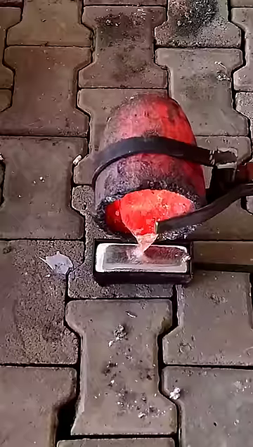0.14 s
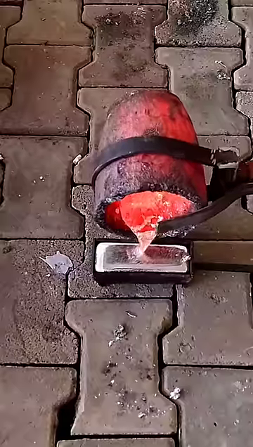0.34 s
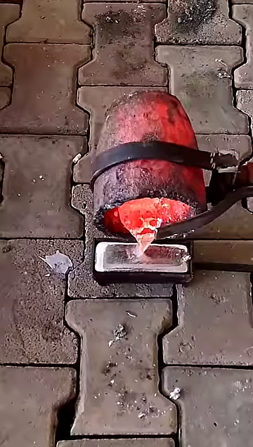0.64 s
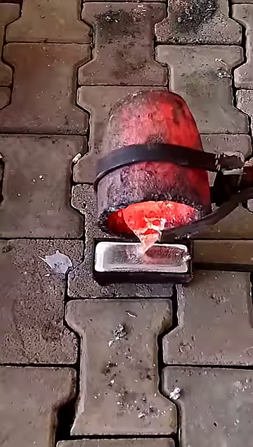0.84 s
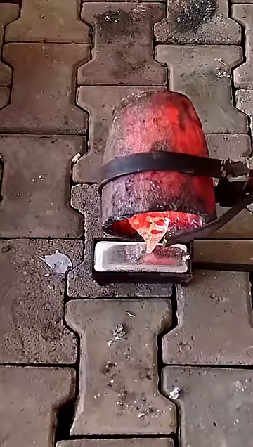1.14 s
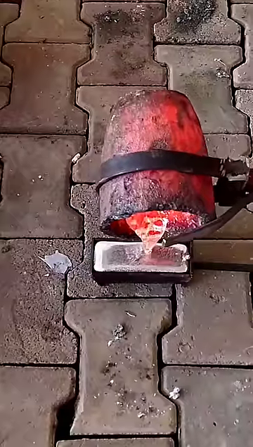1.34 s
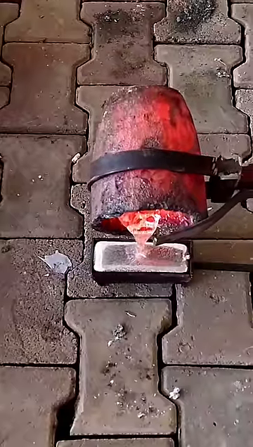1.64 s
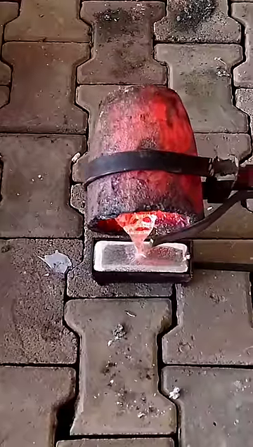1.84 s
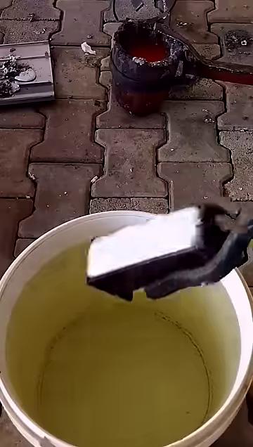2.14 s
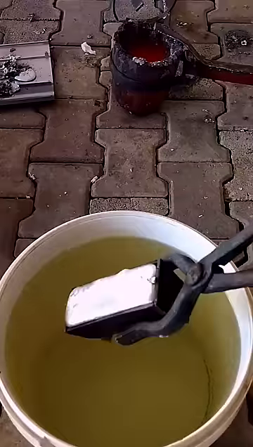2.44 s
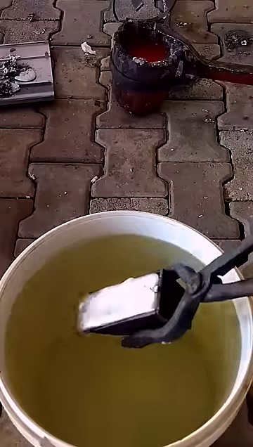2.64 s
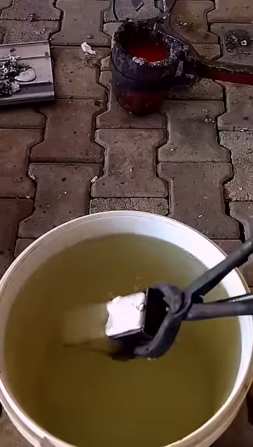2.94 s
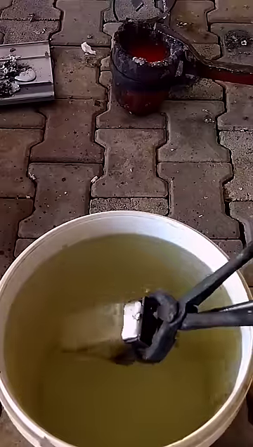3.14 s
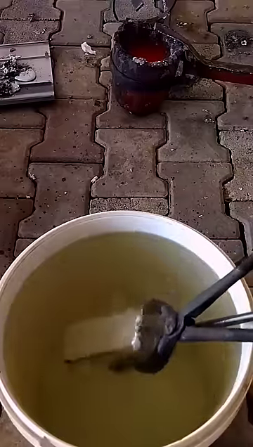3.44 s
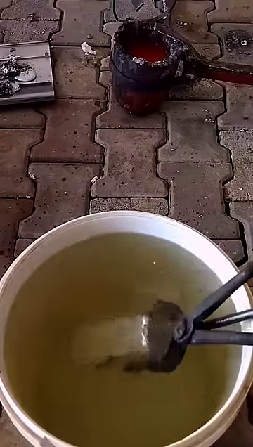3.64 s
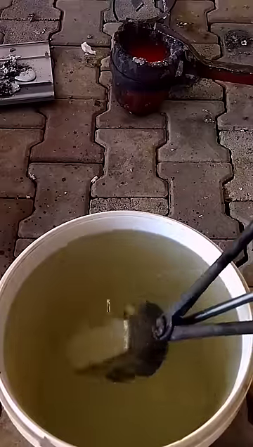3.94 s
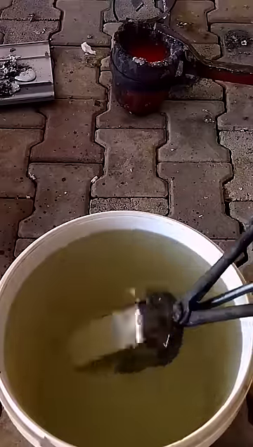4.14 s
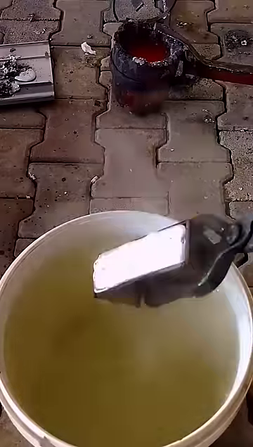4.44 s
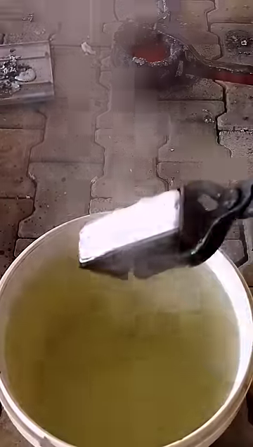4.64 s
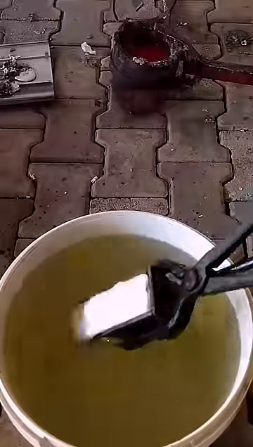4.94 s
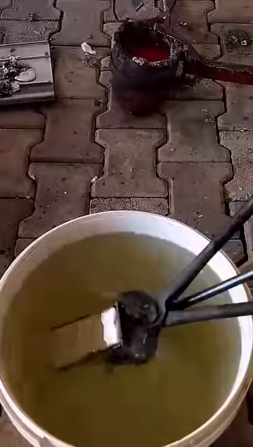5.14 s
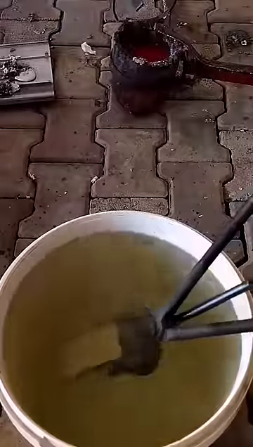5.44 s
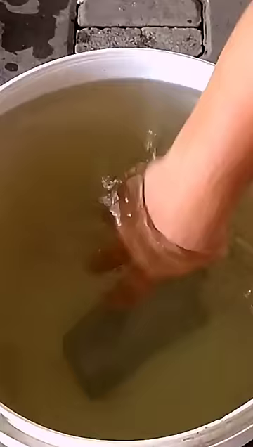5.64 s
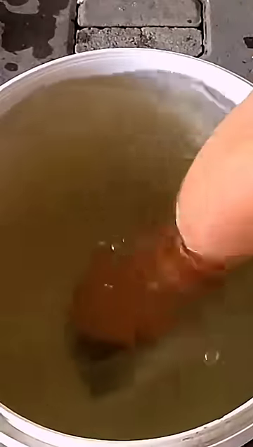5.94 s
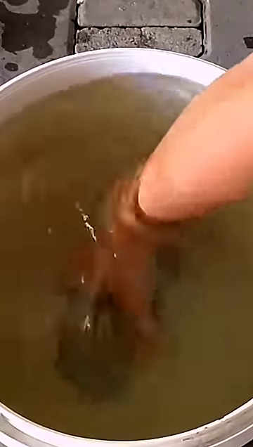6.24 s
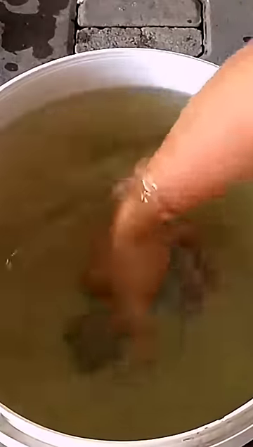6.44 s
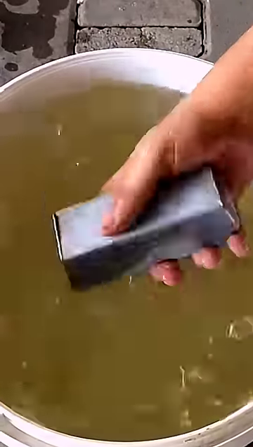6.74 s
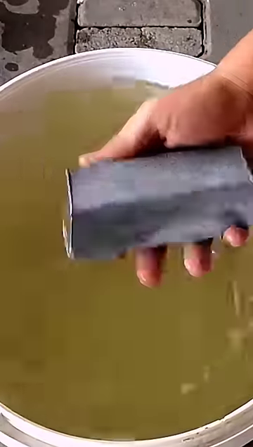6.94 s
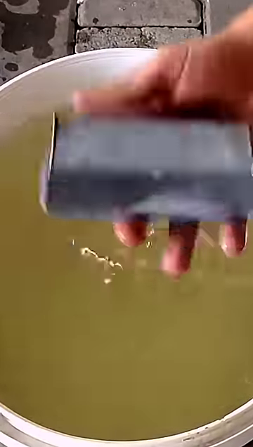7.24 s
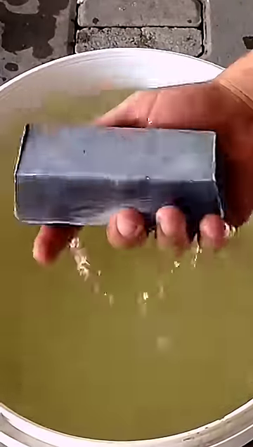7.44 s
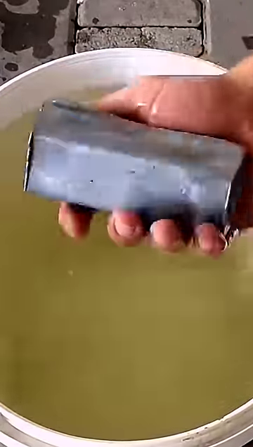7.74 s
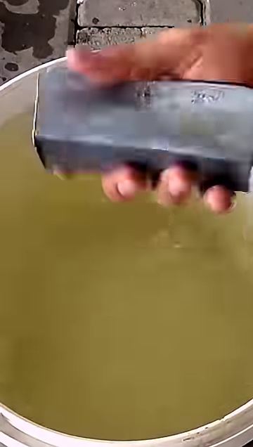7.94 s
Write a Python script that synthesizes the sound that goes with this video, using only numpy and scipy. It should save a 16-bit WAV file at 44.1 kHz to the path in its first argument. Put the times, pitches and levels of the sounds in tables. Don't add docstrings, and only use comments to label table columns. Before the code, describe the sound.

Outdoors in a paved yard, very quiet distant traffic, unsteady hum and faint metallic crackle come first. After a cut, a hot ingot hits water in a plastic bucket: loud harsh hiss, sizzle and popping steam bubbles, sinking into duller gurgles and knocks. It is raised with a pop and short sizzle, dipped again with a weaker burst, then a hand swishes and splashes out. Close stereo phone microphones above.

```python
import sys
import numpy as np
from scipy import signal
from scipy.fft import rfft, irfft, next_fast_len
from scipy.io import wavfile
from scipy.ndimage import uniform_filter1d, map_coordinates

SR = 44100
rng = np.random.default_rng(int(sys.argv[2]) if len(sys.argv) > 2 else 0)


def master(y):
    cut = np.clip(np.atleast_2d(y).T, -1, 1)
    pcm = np.round(cut * 32767)
    wavfile.write(sys.argv[1], SR, pcm.astype(np.int16))


def ratio_of_db(decibels):
    return 10 ** (np.asarray(decibels, float) / 20)


N = 356328

# time_s, vigour_db, depth (0 in the air, 1 sunk)
APPROACH = [(1.935, -56.5, 0.62), (2.03, -64, .5), (2.14, -68, 0.32), (2.209, -52.5, .06),
            (2.279, -62.5, .2), (2.285, -64.5, 0.022)]
FIRST_DIP = [(2.289, -44.5, .1), (2.301, -24, .12), (2.41, -30.5, 0.053), (2.511, -24.5, 0.24),
             (2.622, -24, 0.41), (2.706, -34.5, 0.34), (2.76, -25, .5), (2.85, -24.5, 0.46),
             (2.912, -31, 0.22)]
SINKING = [(2.965, -27, 0.34), (3.086, -27.5, .5), (3.224, -33, 0.32), (3.3, -30, 0.44),
           (3.384, -37.5, 0.34), (3.43, -43, 0.72), (3.69, -42.5, 0.98), (4.201, -47, 0.91)]
RAISED = [(4.226, -39, 0.14), (4.292, -30, 0.085), (4.334, -33.5, 0.21), (4.506, -52, .1),
          (4.656, -52.5, .02), (4.9, -58, 0.09)]
SECOND_DIP = [(4.91, -56, .02), (4.954, -29.5, 0.013), (5.046, -26.5, 0.061), (5.12, -35.5, 0.15),
              (5.192, -32.5, 0.28), (5.255, -38, 0.12), (5.31, -44, .65), (5.4, -46, 0.91),
              (5.659, -54.5, 0.82)]
# time_s, vigour_gain_db, depth_gain, fade_s
FILM_BURSTS = [
    (2.302, 7.5, -.04, 0.02),
    (2.348, 3.5, .25, 0.039),
    (2.932, 11.5, 0.16, 0.013),
    (3.394, 10, 0.26, .015),
    (3.728, 4.5, -0.028, 0.015),
    (3.842, 0, -.14, .1),
    (4.211, 12, 0.15, 0.0085),
    (5.279, 17.5, 0.25, 0.011),
]
BURST_RISE_S = 0.0075
# steam_db, sizzle_db, bubbling_db, gurgle_db
LAYERS_BY_DEPTH = [
    (0.5, -7.5, -12, -31.5),
    (-2, -4.5, 0.5, -26),
    (-12.5, -9, -0.5, -14.5),
    (-15, -8.5, 0, -1),
    (-27.5, -17.5, -8, -2.5),
]
BUBBLE_HZ, SINK_OCTAVES = 1000, 1.2
GURGLE_LAG_S, GURGLE_AT_ONCE = 0.075, 0.3
FRESH_FILMS = (2.289,)
FRESH_OCTAVES, GROWTH_S, FRESH_QUIET_DB = 1.3, 0.032, 14
COOLING_OCTAVES_PER_S = 0.12

# time_s, peak_db, pitch_hz, pitch_change (per length)
POCKETS = [(2.301, -16, 1300, -0.42), (2.346, -28.5, 690, 0.29), (2.507, -17.5, 1354, -.081),
           (2.551, -12, 870, 0.015), (2.579, -18, 625, -0.33), (2.718, -18, 1095, -0.61),
           (2.762, -25, 600, -0.6), (2.823, -23, 990, -0.16), (2.838, -16.5, 1075, -0.41),
           (2.929, -8, 734, -0.35), (2.967, -28.5, 369, -.26), (2.63, -24.5, 300, -.2),
           (3.225, -24.5, 415, -.4), (5.03, -35, 370, -.2), (5.135, -32, 428, -.3), (5.19, -31.5, 340, -.1),
           (3.385, -27.5, 710, -0.44), (3.45, -28, 323, -0.31), (3.601, -30.5, 401, -0.82),
           (5.183, -29.5, 802, -.47), (5.273, -13, 717, -0.1), (5.317, -26, 680, -0.7),
           (5.385, -40, 708, 0.015), (2.479, -25, 401.5, -0.19), (2.314, -28, 845, -.6),
           (2.335, -29, 430, -.3)]
POCKET_S = 0.005
# time_s, peak_db, pitch_hz
GULPS = [(3.569, -31.5, 153), (3.712, -34, 303), (3.761, -21.5, 185), (3.804, -23.5, 148),
         (3.946, -34, 185), (3.996, -39, 214), (4.167, -34, 382), (5.507, -41, 119.3), (5.569, -44, 242),
         (5.606, -38, 203)]
GULP_S, GULP_GLIDE = 0.0026, -0.33
# crest_s, peak_db, pitch_hz, length_s, pitch_change (per length)
CHIRPS = [(2.2932, -24.5, 2330, 0.0033, -0.79), (2.3043, -18.5, 2090, 0.0055, -0.12),
          (2.9287, -20, 1480, 0.0056, -0.062), (4.209, -22, 400, 0.0034, -0.62),
          (5.2825, -29.5, 2110, .004, -0.077), (5.294, -26.5, 402, .008, -.1),
          (6.7665, -27.5, 1674, 0.0041, 0.45), (6.791, -22, 2980, .0014, -.1)]
# time_s, level_db, pitch_hz
SQUEAL = [(5.53, -64, 2000), (5.58, -58, 2050), (5.6, -59, 2100), (5.63, -58.5, 2450), (5.66, -62, 2500)]

# time_s, stir_db
GROPE = [(5.66, -53), (5.68, -56.5), (6.05, -59), (6.5, -68.5), (6.59, -71.5)]
SPLASH = [(6.6, -79), (6.63, -60.5), (6.674, -52.5), (6.741, -42), (6.768, -32), (6.781, -45),
          (6.842, -52.5), (7.0, -61), (7.38, -86)]
SPRAY_UNDER_DB, SPRAY_OUT_DB = -23, -8
# start_s, peak_db, pitch_hz, t60_s, pitch_rise (per t60)
DRIPS = [(6.87, -62, 3030, 0.64, -0.066), (5.285, -32, 714, 0.29, .01), (3.862, -36, 1163, 0.019, 0.21),
         (5.787, -45, 1260, 0.064, 0.16), (6.678, -32, 1060, 0.019, 0.28),
         (6.707, -31.5, 974, 0.034, -0.48), (6.721, -33, 675, 0.064, 0.085),
         (6.739, -36.5, 566, 0.11, 0.42), (6.762, -36, 1081, 0.032, 0.048), (6.952, -43, 2420, 0.025, .05),
         (7.041, -41, 1103, 0.052, -0.078), (7.055, -45, 1480, 0.038, .1),
         (7.692, -54.5, 1000, 0.066, 0.038)]
# start_s, peak_db, push_s
POPS = [
    (4.2068, -14, 0.00051),
    (6.678, -35.5, 0.00015),
    (6.764, -29.5, 0.00013),
    (3.8127, -40.5, .0003),
]
# start_s, peak_db, centre_hz, t60_s, rise_s
TICKS = [(1.222, -53.5, 10520, 0.17, .006), (1.725, -63, 11070, 0.066, .005),
         (1.824, -56.5, 10520, 0.043, .003), (2.434, -13.5, 8440, 0.088, 0.0087),
         (3.722, -45, 2200, 0.054, .003), (3.812, -41, 2480, 0.02, 0.00089),
         (3.85, -40, 3600, 0.027, 0.0018), (4.067, -50, 2000, 0.06, 0.0013),
         (4.206, -26, 2438, .015, .0003), (5.529, -40.5, 2680, 0.024, 0.00065),
         (6.622, -54, 9010, 0.038, .001), (6.677, -48, 4000, 0.014, 0.00051),
         (6.728, -41.5, 8500, 0.022, .001), (6.764, -35.5, 7115, 0.021, 0.0016),
         (6.862, -55, 10000, .015, .001), (7.357, -49.5, 11620, 0.038, .001),
         (7.475, -56.5, 11460, .012, 0.00039), (7.642, -58.5, 12500, .012, .0005),
         (7.67, -54.5, 13500, .012, .0005), (7.692, -47, 4800, .012, .0004),
         (7.992, -51, 9950, 0.014, 0.00044)]
# start_s, peak_db, centre_hz, t60_s
FLICKS = [(1.228, -62.5, 2200, 0.27), (1.944, -54, 1700, .45), (5.655, -64, 8880, .04),
          (6.178, -75.5, 10000, .04), (6.48, -69.5, 9000, 0.066)]
FLICK_RISE_S = 0.002

# frequency_hz, level_db (per Hz)
STEAM_COLOUR = [(2060, -25), (3500, -3), (4540, -1), (4930, -4.5), (6470, -2), (7200, -8.5), (9280, 1.5),
                (11300, -1.5), (12300, 0.5), (15200, -5), (15900, -29)]
SIZZLE_COLOUR = [(760, -25), (1300, -3), (1440, -11.5), (1600, -6), (1910, -6), (2430, -5), (6000, -14),
                 (7800, -37), (13200, -120)]
FROTH_COLOUR = [(250, -38), (400, -13), (800, 2.5), (1500, -3.5), (2400, -22.5)]
GURGLE_COLOUR = [(24, -48.5), (40, -17), (146, -7), (311, -3), (337, -6.5), (399, -4.5), (489, -19),
                 (600, -15), (780, -44), (1320, -120)]
TRICKLE_COLOUR = [(210, -57), (350, -35), (642, -1), (1230, -1.5), (1640, -2.5), (3010, -7), (6000, -22.5),
                  (7800, -56.5), (13200, -120)]
AIR_COLOUR = [(180, -37), (300, -3.5), (472, -8.5), (542, -10), (1400, -13.5), (2740, -20), (8000, -36.5),
              (10400, -75.5), (17600, -120)]
FIZZ_COLOUR = [(4500, -29.5), (6500, -8.5), (7600, -12), (9400, -0.5), (12400, -3), (15900, -2.5)]
TRAFFIC_COLOUR = [(15, -76), (25, -38), (43, -33), (51, -16), (62, -5.5), (86, 1), (129, -3.5), (188, -3.5),
                  (233, -3), (365, -15.5), (500, -17.5), (650, -51.5), (1100, -120)]

# frequency_hz, t60_s
WALLS = [(200, 0.88), (2000, 0.39), (10000, 0.36)]
# pitch_hz, level_db (over the rumble), start_s, end_s
HUM = [(81.5, -7, 1, 9.1), (259, -5.5, 0, 1.92), (214, -6, 0.7, 1.7), (228, -3.5, 5.5, 8.1)]
# time_s, level_db
RUMBLE_LEVEL = [(0, 2.5), (1.3, -1.5), (1.5, 0.5), (1.92, 4), (1.94, 3), (5.66, 1.5), (5.7, 9),
                (6.05, 8.5), (6.6, 1), (7.5, 0), (8.08, 1)]
# time_s, level_db
COOLING = [(0, -79.5), (1.15, -76.5), (1.3, -73), (1.5, -76), (1.92, -73.5), (1.94, -81), (7.3, -81.5),
           (7.5, -75.5), (8.08, -83)]
RUMBLE_DB, AIR_DB, AIR_FOLLOWS = -63.5, -65, 0.25

# frequency_hz, left_minus_right_db
PORTS = [(60, -1), (130, 0), (290, 0.5), (640, -1.5), (1410, -0.5), (3100, 1.5), (6820, 2.5), (15000, 2)]
# frequency_hz, likeness (1 the same)
NEAR_ALIKE = [(60, 1), (290, 1), (640, 0.89), (1650, 0.56), (4970, 0.25), (15000, -0.14)]
YARD_ALIKE = [(60, 1), (290, 0.73), (950, 0.18), (15000, 0.062)]
# start_s, end_s
JOIN = (1.921, 1.933)
TOP_HZ = 15900


def unit(x):
    return x / np.sqrt(np.mean(x ** 2) + 1e-20)


def along(points, hz):
    f, v = np.transpose(points)
    return np.interp(np.log(hz + 1), np.log(f + 1), v)


def curves(rows):
    s, *cols = np.transpose(rows)
    return [np.interp(np.arange(N) / SR, s, c, left=-120, right=-120) for c in cols]


def wobble(rate):
    knots = rng.standard_normal(int(N * rate / SR) + 4)
    return map_coordinates(knots, [np.arange(N) * rate / SR])


def filtered(x, response):
    m = next_fast_len(N + 8192)
    return irfft(rfft(x, m) * response(np.fft.rfftfreq(m, 1 / SR)), m)[..., :N]


def rush(colour, patchy_db, spiky_db):
    z = signal.stft(rng.standard_normal((2, N)), nperseg=512)[2]
    field = rng.standard_normal(z.shape[1:])
    for axis in (0, 1):
        field = uniform_filter1d(field, size=6, axis=axis)
    pair = signal.istft(z * ratio_of_db(patchy_db * unit(field)), nperseg=512)[1][:, :N]
    grainy = pair * ratio_of_db(spiky_db * wobble(400))
    return unit(filtered(grainy, lambda hz: ratio_of_db(along(colour, hz))))


def blips(s, db, hz, life, glide, swell, size):
    s, db, hz, life, glide, swell = (np.asarray(v)[:, None] for v in (s, db, hz, life, glide, swell))
    u = np.arange(size) / SR / life - 2
    shape = np.where(u < 0, np.exp(-1.4 * u * u), np.exp(-0.8 * np.abs(u)))
    cycles = hz * life * (u + glide * np.log(np.cosh(u / 2)))
    wave = ratio_of_db(db) * shape * np.sin(2 * np.pi * cycles)
    at = np.round((s + swell - 2 * life) * SR).astype(int) + np.arange(size)
    return np.bincount(np.clip(at, 0, N).ravel(), wave.ravel(), N + 1)[:N]


def swarm(pitch_hz, spread, cycles, glide, span, count, size):
    when = rng.uniform(*span, count)
    tune, big = rng.standard_normal((2, count))
    hz = pitch_hz[(when * SR).astype(int)] * np.exp(spread * np.clip(tune, -1.6, 1.7))
    crowd = blips(when, 2.1 * big, hz, cycles / hz, np.full(count, glide), 0 * hz, size=size)
    return unit(crowd) * np.sqrt((span[1] - span[0]) * SR / N)


def twin(x):
    knots = np.cumsum(rng.standard_normal(200))
    places = np.linspace(0, SR / 2, len(knots))
    return np.array([x, filtered(x, lambda hz: np.exp(1.5j * np.interp(hz, places, knots)))])


def boiling():
    steam_db, sizzle_db, bubble_db, gurgle_db, pitch_hz = handling()
    dips = (1.9, 5.7)  # start_s, end_s
    surge = wobble(28)
    steam = ratio_of_db(steam_db + 0.37 * surge + 1.8 * wobble(76)) * rush(STEAM_COLOUR, patchy_db=1.5, spiky_db=1.0)
    sizzle = ratio_of_db(sizzle_db + 0.42 * surge)
    bubbling = ratio_of_db(bubble_db - 1.5 + 0.59 * surge)
    gurgle = ratio_of_db(gurgle_db + 1.93)

    noise = 0.95 * sizzle * rush(SIZZLE_COLOUR, patchy_db=2.1, spiky_db=2.0)
    noise += 0.81 * bubbling * rush(FROTH_COLOUR, patchy_db=1.0, spiky_db=3.5)
    noise += 0.91 * gurgle * rush(GURGLE_COLOUR, patchy_db=2.0, spiky_db=-0.7)

    crackle = swarm(np.full(N, 2800.), spread=0.21, cycles=1.5, glide=-0.1, span=dips, count=5000, size=128)
    crowd = swarm(np.clip(pitch_hz, 300, 2600), spread=0.4, cycles=2.2, glide=-0.32, span=dips,
                  count=2400, size=700)
    lumps = swarm(np.full(N, 210.), spread=0.35, cycles=1.3, glide=-0.3, span=dips, count=600, size=1800)
    bubbles = 0.82 * sizzle * crackle + 0.77 * bubbling * crowd + 0.44 * gurgle * lumps
    return steam + noise + twin(bubbles + pockets())


def handling():
    vigour_db, depth = curves(APPROACH + FIRST_DIP + SINKING + RAISED + SECOND_DIP)
    t = np.arange(N) / SR
    for s, gain_db, deeper, fade in FILM_BURSTS:
        u = t - s
        burst = np.exp(-np.where(u < 0, (u / BURST_RISE_S) ** 2, u / fade))
        vigour_db = vigour_db + gain_db * burst
        depth = depth + deeper * burst
    depth = np.clip(depth, 0, 1)
    steps = np.linspace(0, 1, len(LAYERS_BY_DEPTH))
    levels = [vigour_db + np.interp(depth, steps, db) for db in np.transpose(LAYERS_BY_DEPTH)]

    keep, power = np.exp(-1 / (GURGLE_LAG_S * SR)), ratio_of_db(levels[3]) ** 2
    lagging = signal.lfilter([1 - keep], [1, -keep], power) * (vigour_db > -100)
    levels[3] = 10 * np.log10(GURGLE_AT_ONCE * power + lagging)

    fresh = sum((t > s) * np.exp(-np.abs(t - s) / GROWTH_S) for s in FRESH_FILMS)
    levels[2:] = [db - FRESH_QUIET_DB * fresh ** 2 for db in levels[2:]]
    cooled = COOLING_OCTAVES_PER_S * (t - FRESH_FILMS[0])
    octaves = FRESH_OCTAVES * fresh - cooled - SINK_OCTAVES * depth + 0.15 * wobble(8)
    return *levels, BUBBLE_HZ * 2 ** octaves


def pockets():
    rows = [(s, db, hz, POCKET_S, glide, POCKET_S) for s, db, hz, glide in POCKETS]
    rows += [(s, db, hz, GULP_S, GULP_GLIDE, POCKET_S) for s, db, hz in GULPS]
    rows += [(*row, 0) for row in CHIRPS]
    db, hz = curves(SQUEAL)
    cycles = np.cumsum(hz * (1 + 0.07 * wobble(300))) / SR
    squeal = ratio_of_db(db + 5 * wobble(150)) * np.sin(2 * np.pi * cycles)
    return blips(*np.transpose(rows), size=4000) + squeal


def lifting():
    trickle_db, = curves(GROPE + SPLASH)
    sunk = np.arange(N) < SPLASH[0][0] * SR
    spray_db = trickle_db + np.where(sunk, SPRAY_UNDER_DB, SPRAY_OUT_DB)
    spray = ratio_of_db(spray_db) * rush(STEAM_COLOUR, patchy_db=1.0, spiky_db=6.5)
    trickle = ratio_of_db(trickle_db - 0.5)
    small = swarm(np.full(N, 1200.), spread=0.5, cycles=5.5, glide=0.48, span=(5.6, 7.4), count=900, size=900)
    sheet = rush(TRICKLE_COLOUR, patchy_db=-2.1, spiky_db=4.5)
    muffled = filtered(sheet, lambda hz: 1.2 / (1 + (hz / 1500) ** 2))
    sheet = np.where(sunk, muffled, sheet)
    return spray + 0.9 * trickle * sheet + twin(0.5 * trickle * small + drops())


def drops():
    out, t = np.zeros(N + SR), np.arange(SR // 3) / SR
    for s, db, hz, t60, rise in DRIPS:
        ring = np.sin(2 * np.pi * hz * (t + rise * t * t / t60 / 2)) * (1 - np.exp(-t / 0.00092))
        out[round(s * SR):][:len(t)] += ratio_of_db(db - 60 * t / t60) * ring
    for s, db, push in POPS:
        out[round(s * SR):][:len(t)] += ratio_of_db(db) * (1 - t / push) * np.exp(-t / push)
    return out[:N]


def ticks():
    out, t = np.zeros((2, N + SR)), np.arange(8192) / SR
    hz = np.fft.rfftfreq(len(t), 1 / SR) + 1
    for s, db, centre_hz, t60, rise in TICKS + [(*row, FLICK_RISE_S) for row in FLICKS]:
        band = ratio_of_db(-14 * np.log2(hz / centre_hz) ** 2)
        skirt = ratio_of_db(-18.5) * hz ** 2 / (hz ** 2 + 2000 ** 2)
        noise = unit(irfft(rfft(rng.standard_normal((2, len(t)))) * (band + skirt)))
        shape = ratio_of_db(db + 2.5 - 60 * t / t60) * (1 - np.exp(-t / rise))
        out[:, round(s * SR):][:, :len(t)] += shape * noise
    return out[:, :N]


def ports(pair, alike, lag_s):
    turn = lambda hz: np.arccos(np.clip(along(alike, hz), -1, 1)) / 2
    mid, side = filtered(pair, lambda hz: np.array([np.cos(turn(hz)), np.sin(turn(hz))]))
    sign = np.array([[1], [-1]])
    return filtered(mid + sign * side, lambda hz: ratio_of_db(sign * along(PORTS, hz) / 2)
                    * np.exp(-1j * np.pi * hz * sign * lag_s))


def walls(x):
    hz, t, z = signal.stft(rng.standard_normal((2, SR // 2)), SR, nperseg=256)
    fade = ratio_of_db(-60 * t / along(WALLS, hz)[:, None])
    tail = signal.istft(z * fade, SR, nperseg=256)[1]
    late = np.pad(x, (400, 0))[None]
    return signal.fftconvolve(late, tail / np.linalg.norm(tail[0]), axes=1)[:, :N]


def yard():
    (change_db,), (crackle_db,) = curves(RUMBLE_LEVEL), curves(COOLING)
    rumble_db, air_db = RUMBLE_DB + change_db, AIR_DB + AIR_FOLLOWS * change_db
    air = ratio_of_db(air_db + 0.28 * wobble(1.8)) * rush(AIR_COLOUR, patchy_db=0.2, spiky_db=1.15)
    fizz = ratio_of_db(crackle_db + 1.5 * wobble(25)) * rush(FIZZ_COLOUR, patchy_db=1.2, spiky_db=2.5)
    rumble = ratio_of_db(rumble_db - 1.5) * rush(TRAFFIC_COLOUR, patchy_db=-1.8, spiky_db=1.0)
    t, hum = np.arange(N) / SR, np.zeros(N)
    for hz, db, on, off in HUM:
        level = (t > on) * (t < off) * ratio_of_db(db + 1.6 * wobble(11))
        hum += level * np.sin(2 * np.pi * np.cumsum(hz + 2.1 * wobble(12)) / SR)
    return ports(air + fizz + rumble, YARD_ALIKE, lag_s=0) + ratio_of_db(rumble_db) * hum


def scene():
    near = boiling() + lifting() + ticks()
    return ports(near, NEAR_ALIKE, lag_s=4e-5) + ratio_of_db(-15.5) * walls(near[0]) + yard()


def low_pass(x):
    return signal.sosfilt(signal.butter(12, 16860, fs=SR, output="sos"), x)


def record(dry):
    t = np.arange(N) / SR
    gate = np.clip(np.maximum(JOIN[0] - t, t - JOIN[1]) / 0.002, 0.02, 1)
    band = filtered(dry * gate, lambda hz: (hz < TOP_HZ) * hz ** 2 / (hz ** 2 + 45 ** 2))
    return low_pass(band)


dry = scene()
out = record(dry)
master(out)
```